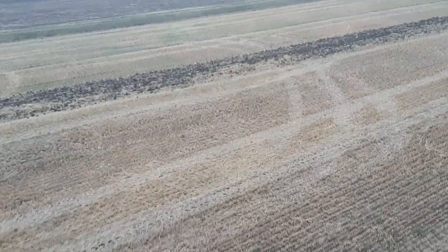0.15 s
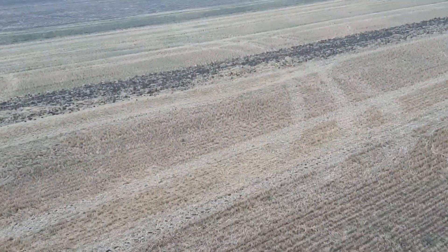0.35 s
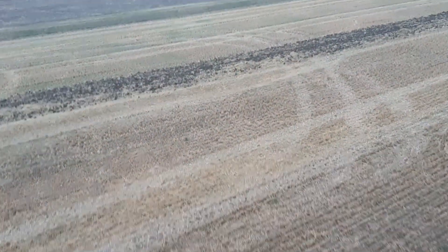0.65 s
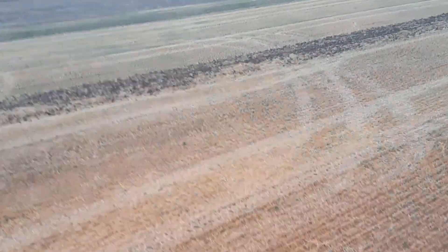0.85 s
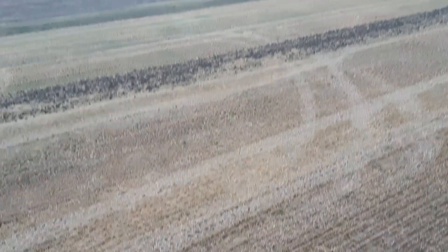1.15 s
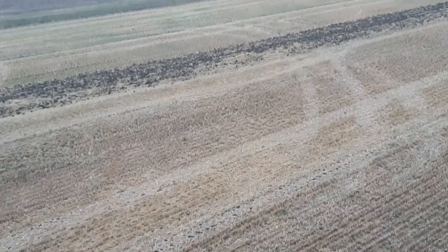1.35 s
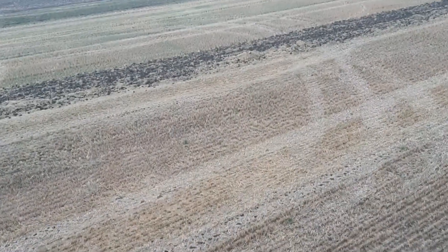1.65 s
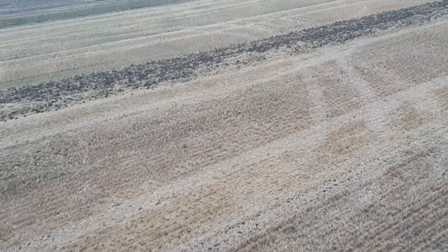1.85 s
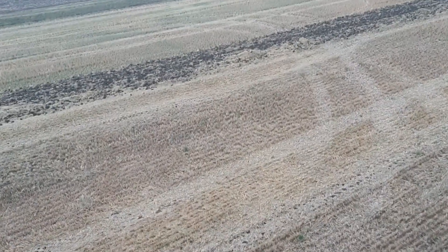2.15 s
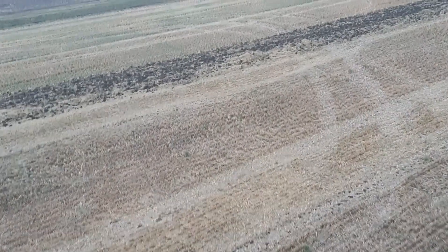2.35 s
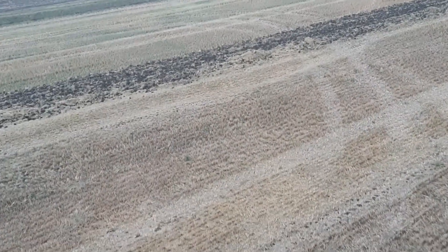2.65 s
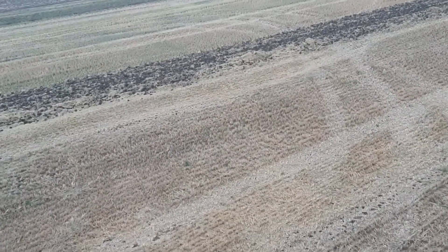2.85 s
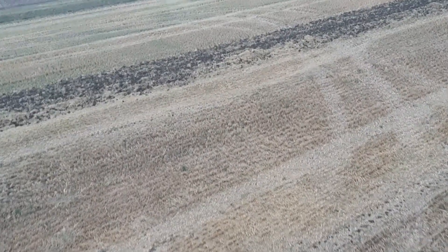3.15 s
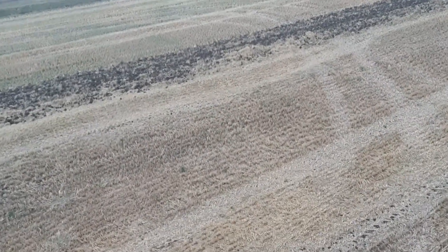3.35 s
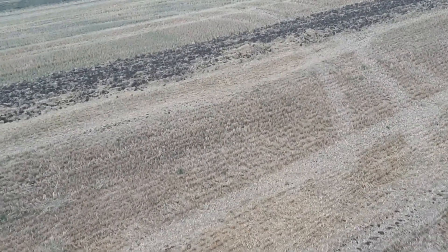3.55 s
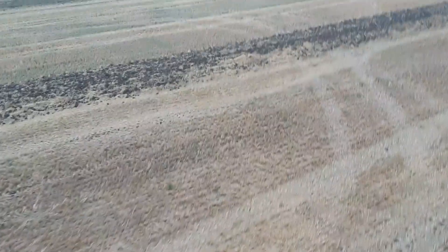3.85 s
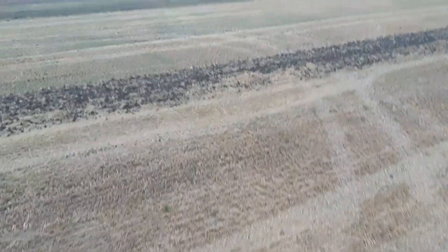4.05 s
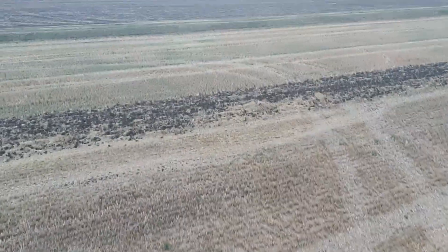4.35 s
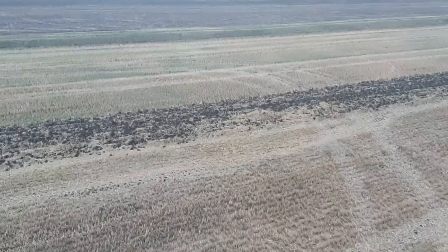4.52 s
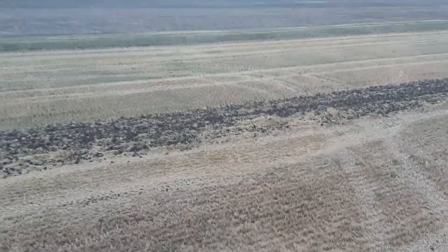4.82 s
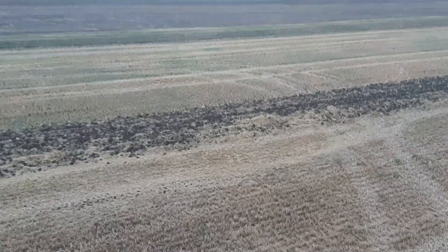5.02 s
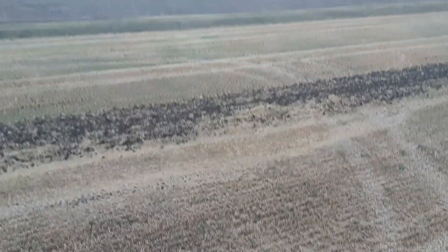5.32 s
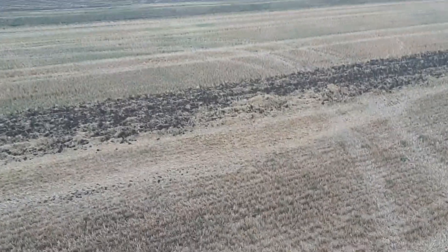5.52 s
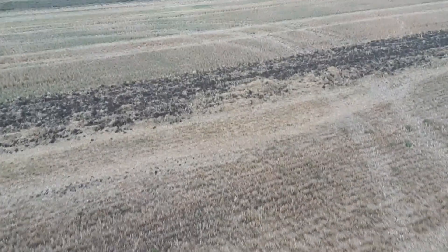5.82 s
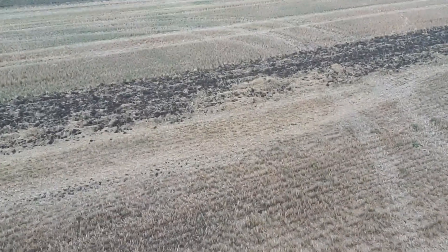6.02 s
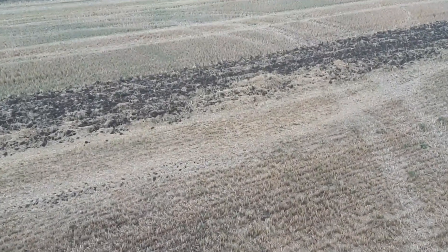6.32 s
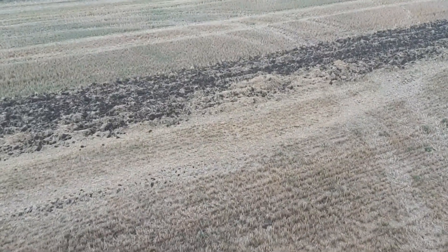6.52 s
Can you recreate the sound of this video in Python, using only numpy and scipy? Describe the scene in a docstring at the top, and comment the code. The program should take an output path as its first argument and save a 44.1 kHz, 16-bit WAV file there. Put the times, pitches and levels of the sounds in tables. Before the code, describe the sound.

Outdoors in a balloon basket, a propane pilot flame runs throughout: a low rumble of quick fluttering puffs with a thin, uneven, slightly resonant gas hiss. It starts a little subdued and rises slightly. At about 0.6 s the valve cracks open with a dull tick and a sharp jet hiss; almost at once the flame catches with a thump and becomes a loud, broad roar with bright hissing edges. At about 0.87 s it shuts, dropping steeply, leaving a faint leak that closes near 1.05 s with small metallic ticks until 1.2 s. The pilot is now ducked by the camera's gain, stays low about a second, then gradually recovers. A tick falls at 2.4 s, faint hollow knocks around 2.6-3.1 s, and faint ticks at 4.5 and 5.9 s. The pilot continues to the end, about 6.5 s. Stereo is close and dry, the right side shaded and duller.

```python
"""A pilot flame rumbles and hisses on a propane burner above a balloon basket. The blast valve opens
once for a third of a second: the jet hisses, the flame catches with a thump and roars. The valve lever
and hot metal tick; faint hollow knocks ring. Flames are shaped noise, ticks noise bursts, knocks sines.
A small camera listens through an open left and a shaded right port; its gain control starts ducked,
ducks again at the blast, holds, and recovers."""
import sys
import numpy as np
from scipy import signal
from scipy.fft import rfft, irfft
from scipy.io import wavfile
from scipy.ndimage import uniform_filter1d, minimum_filter1d

SR = 44100
rng = np.random.default_rng(int(sys.argv[2]) if len(sys.argv) > 2 else 0)


def generate_wav(sig):
    """Save sig (samples, or channels by samples) to the path in sys.argv[1] as 16-bit PCM at SR."""
    pcm = np.round(np.clip(np.atleast_2d(sig).T, -1, 1) * 32767).astype(np.int16)
    wavfile.write(sys.argv[1], SR, pcm)


N = 294588

# Phase by which the left port leads for pilot and ticks. Each row: frequency in Hz, phase in radians.
PILOT_LEAD = [(0, 0), (860, 0.0), (1120, 4.4), (2670, 5.8), (3530, 3.2), (3880, -1.4), (5940, -3.9),
              (6980, -6.4), (7580, -4.9), (11500, -17.1), (13700, -22.3), (16000, -42.2)]

# All levels in dB below stand ahead of the camera's gain control.
# Blast valve: cracks open, is fully open, the gas lights, shuts, seats fully (s)
CRACK_S, OPEN_S, LIGHT_S, SHUT_S, SEATED_S = .587, .626, .637, .872, 1.053


def blast():
    """The jet hisses first; the flame catches with a thump, roars, and both die away."""
    # Blast colour at the open port. Each row: frequency in Hz, relative level in dB per Hz.
    slope = [(28, -32.5), (45, -32), (70, -4.5), (150, 2), (260, -2), (330, -7), (600, -11.5), (1200, -15),
             (2300, -19), (3600, -17), (5500, -14.5), (8000, -24), (12500, -24), (15700, -19)]
    # Its resonances and echo notches. Each row: centre in Hz, width in Hz, height in dB.
    modes = [(900, 410, -6), (1185, 80, 6.5), (2820, 105, 13.5), (3740, 270, 6.5), (4020, 230, -7),
             (4980, 200, 6.5), (5770, 690, 7.5), (6300, 220, 3.5), (8970, 520, 10.5), (10000, 370, -3),
             (11070, 380, 9)]
    # Ripples at the shaded port for a blast. Each row: centre in Hz, width in Hz, height in dB.
    ripples = [(1079, 330, -9), (1740, 290, 4.5), (2570, 90.0, 2.5), (3440, 90.0, -5), (7230.0, 300.0, 3),
               (9920.0, 160.0, 6.5)]
    # Phase by which the left port leads. Each row: frequency in Hz, phase in radians.
    lead = [(350, 0), (800, .6), (1050, 0), (1400, -1.1), (1900, -1.2), (2500, .3), (3000, -.3),
            (3600, 1.7), (5770, 2.5), (6550, 7), (16000, 4.8)]

    def colour_db(hz):
        """Blast spectrum: broad slope plus resonances and notches."""
        return read(slope, hz) + bumps(modes, hz)

    roar, jet = at_ports(colour_db, ripples, lead, alike_power=0.84, patchy_db=2.0)
    treble_band = signal.butter(4, 7500, "high", fs=SR, output="sos")
    treble = signal.sosfiltfilt(treble_band, jet)
    t = np.arange(N) / SR
    jet_db, treble_db = jet_levels(t)
    jet = jet + (gain_of(treble_db) - 1) * treble  # slow gas hisses duller
    lumps = flicker(per_s=48)
    flame_sound = roar * roar_gain(t) * gain_of(0.77 * lumps)
    jet_sound = jet * gain_of(jet_db + 0.92 * lumps)
    return flame_sound + jet_sound


def jet_levels(t):
    """Level and treble lift of the gas jet in dB: swell, hold, fall, leak, drain."""
    full_db, rise_db_per_s, fall_db_per_s = -13, 447, 371  # swell up to OPEN_S, fall after SHUT_S
    crack_db_per_s = 1301  # how sharply the first gas bites at CRACK_S
    # gas leaks on until the valve seats, then the line drains
    shut_leak_db, seat_drop_db, drain_db_per_s = -38, -6, 68
    dip_db, dip_delay_s, dip_s = -8.5, 0.0091, .016  # the hiss dips briefly as the flame catches
    bright_above_db, dull_per_db = -26.5, 0.6  # below this jet level the treble falls faster
    flare_db, flare_s = 5.5, 0.049  # extra treble just after lighting

    seated = np.maximum(t - SEATED_S, 0)
    seating_db = seat_drop_db * np.minimum(seated / 0.013, 1)
    leak_db = np.where(t > SHUT_S, shut_leak_db + seating_db - drain_db_per_s * seated, -200)

    swell_db = -rise_db_per_s * np.maximum(OPEN_S - t, 0)
    fall_db = -fall_db_per_s * np.maximum(t - SHUT_S, 0)
    crack_db = -crack_db_per_s * np.maximum(CRACK_S - t, 0)
    level_db = np.maximum(full_db + swell_db + fall_db + crack_db, leak_db)

    lit = np.maximum(t - LIGHT_S, 0)
    dulling_db = dull_per_db * np.minimum(level_db - bright_above_db, 0)
    treble_db = dulling_db + flare_db * (lit > 0) * bell(lit, 0, flare_s)
    return level_db + dip_db * bell(t, LIGHT_S + dip_delay_s, dip_s), treble_db


def roar_gain(t):
    """The flame catches at once, thumps, sags a little, dies after the jet and lingers."""
    roar_db, catch_db_per_s, sag_db_per_s = -4, 3501.5, 9
    thump_db, thump_delay_s, thump_s = 0.5, 0.014, .013
    lag_s, fall_db_per_s = 0.023, 310  # the flame outlives the jet
    linger_db, linger_db_per_s = -33.5, 44.5  # last flames on the burner

    lit = np.maximum(t - LIGHT_S, 0)
    dying = np.maximum(t - SHUT_S - lag_s, 0)
    catch_db = -catch_db_per_s * np.clip(LIGHT_S - t, 0, .05)
    thump = thump_db * bell(lit, thump_delay_s, thump_s)
    flame_db = roar_db - sag_db_per_s * lit + thump - fall_db_per_s * dying
    last_flames = gain_of(linger_db - linger_db_per_s * dying)
    return gain_of(catch_db) * (gain_of(flame_db) + last_flames)


def pilot():
    """Small flame: a rumble of quick puffs and a gas hiss that flutters a little with it."""
    # Pilot colour at the open port. Each row: frequency in Hz, relative level in dB per Hz.
    slope = [(30, -50), (50, -47), (80, -11.5), (130, 1), (250, 2), (500, -2.5), (800, -13), (1500, -13.5),
             (4000, -18.5), (7500, -22), (8500, -37), (12500, -45.5), (15700, -36.5)]
    # Its resonances and echo notches. Each row: centre in Hz, width in Hz, height in dB.
    modes = [(896, 113, -14.5), (1092, 177, -12), (1213, 170, 5.5), (1707, 176, -16.5), (1962, 72, 7.5),
             (2156, 384, -10), (2776, 147, 10.5), (2998, 158, 12.5), (3465, 180.0, -5), (3766, 118, -10.5),
             (3995, 176, -11.5), (5235, 95, 11.5), (5840, 160, 5), (6085, 240, 11), (6620, 234, -15),
             (7300, 220, -14), (8120.0, 140.0, -5), (10700, 290.0, 2)]
    # Ripples at the shaded port for the pilot. Each row: centre in Hz, width in Hz, height in dB.
    ripples = [(963, 48, 2), (1130, 210, -12), (1555, 130, -15), (1722, 250, 13), (2304, 280, 7),
               (2960, 300, -9.5), (3340, 90.0, 3.5), (3876, 210, 11.5), (4240, 100.0, -8),
               (5300, 130.0, -6), (5470.0, 120.0, 6.5), (5860, 210.0, 9), (6100, 100.0, -20),
               (8170.0, 170.0, -1.5)]
    rumble_db, hiss_db = -39, -46.5  # middle levels, about which the flame flutters

    def colour_db(hz):
        """Pilot spectrum: broad slope plus resonances and notches."""
        return read(slope, hz) + bumps(modes, hz)

    rumble, hiss = at_ports(colour_db, ripples, PILOT_LEAD, alike_power=1.0, patchy_db=1.57)
    puffs, sway = flicker(per_s=143), flicker(per_s=24)
    rumble_sound = rumble * gain_of(rumble_db + 1.48 * puffs + 0.19 * sway)
    hiss_sound = hiss * gain_of(hiss_db + 0.74 * puffs + 0.069 * sway)
    return rumble_sound + hiss_sound


def ticks():
    """Each tick starts sharply and scatters off the frame as a short tail, dull or bright."""
    # Ticks of the valve lever and hot metal. Each row: start in seconds, starting level in dB before
    # the tilt, time to fall 60 dB in seconds, brightness tilt in dB per octave (flattening in the bass).
    tick_rows = [(.621, -24, .07, -6), (1.027, -41, .13, 3), (1.140, -54, .12, -2), (1.179, -50, .14, -1),
                 (2.373, -46, .17, 0), (2.838, -61, .1, 3), (4.478, -55, .28, -5), (5.886, -50, .16, -1)]
    # Tick colour before the tilt. Each row: frequency in Hz, relative level in dB per Hz.
    slope = [(500, -20), (1500, -9), (4000, -7), (6000, -1), (9000, -2), (12000, -6), (15000, 1)]

    def colour_db(hz):
        """Tick spectrum."""
        return read(slope, hz)

    _, ring = at_ports(colour_db, [(12000, 12000, -6)], PILOT_LEAD, alike_power=1.5, patchy_db=1.0)
    out, size = np.zeros((2, N)), 8192  # longest tail in samples
    t, hz = np.arange(size) / SR, np.fft.rfftfreq(size, 1 / SR)
    octaves = np.log2(hz / 8000 + .05)
    for start_s, db, t60, tilt_db in tick_rows:
        at = round(start_s * SR)
        spectrum = rfft(ring[:, at:at + size])
        tilted = irfft(spectrum * gain_of(tilt_db * octaves))
        out[:, at:at + size] += tilted * gain_of(db - 60 * t / t60)
    return out


def knocks():
    """Short hollow sine rings with soft edges, nearer the open port."""
    # Faint knocks. Each row: start in seconds, level in dB before the soft edge and the port
    # difference, pitch in Hz, time to fall 60 dB in seconds.
    knock_rows = [(2.575, -43, 1250, .12), (2.731, -43, 1180, .1), (2.836, -41, 1330, .12),
                  (2.84, -41, 1520, .1), (3.07, -45, 1300, .1)]
    t, out = np.arange(N) / SR, np.zeros(N)
    for start_s, db, hz, t60 in knock_rows:
        age = np.maximum(t - start_s, 0)
        soft_edge = 1 - np.exp(-age / 0.0018)
        out = out + gain_of(db - 60 * age / t60) * soft_edge * np.sin(2 * np.pi * hz * age)
    return out * gain_of([[1.5], [-6]])  # dB at the left and right port


def at_ports(colour_db, ripples, lead, alike_power, patchy_db):
    """Noise of a colour as both ports hear it, split in a low and a high part."""
    # The right port lies in the shade of the camera body.
    # Each row: frequency in Hz, level in dB against the left port, before the ripples.
    shade = [(200, 0.0), (400, 1.5), (800, -0.3), (2000, -4.5), (4000, -7.5), (4400, -19.5), (5000, -29),
             (6500, -7.5), (9000, -14.5), (13500, -4), (15700, -12.5)]
    # Likeness of the ports. Each row: frequency in Hz, likeness 0-1 before the echo dips and power.
    alike = [(200, 1), (350, 0.99), (600, 0.99), (900, 0.88), (2000, 0.92), (3000, 0.82), (4000, 1),
             (5000, .2), (6200, .7), (7800, 0.39), (8300, 0.14), (15000, .05)]
    echo_hz, echo_first_hz = 599, 1080  # likeness dips at the notches of a short echo

    frames, hz = N // 256 + 5, np.fft.rfftfreq(1024, 1 / SR)
    a, b, c, d, patches = rng.standard_normal((frames, 513, 5)).T
    left = a + 1j * b
    stranger = c + 1j * d  # what the right port hears on its own

    notches = np.cos(np.pi * (hz - echo_first_hz) / echo_hz) ** 8
    dips = 1 - 0.28 * (hz > .8 * echo_first_hz) * notches
    same = (np.clip(read(alike, hz) * dips, 0, 1) ** alike_power)[:, None]
    delayed = left * np.exp(-1j * read(lead, hz))[:, None]
    right = same * delayed + np.sqrt(1 - same ** 2) * stranger
    right = right * gain_of(read(shade, hz) + bumps(ripples, hz))[:, None]

    # slow patches of level; the treble wavers most
    patches = uniform_filter1d(patches, size=14, axis=0)
    patches = uniform_filter1d(patches, size=30, axis=1)
    drift = patchy_db * np.sqrt(hz / 6000)[:, None] * patches / patches.std()
    spectra = np.array([left, right]) * gain_of(colour_db(hz)[:, None] + drift)

    low = 1 / (1 + (hz / 900) ** 6)[:, None]  # share of power in the low part
    parts = []
    for share in (low, 1 - low):
        sound = signal.istft(spectra * np.sqrt(share), nperseg=1024, noverlap=768)[1]
        parts.append(evened(sound[:, :N]))
    return parts


def flicker(per_s):
    """Turbulence: noise smoothed to a given rate, rms 1."""
    size = round(SR / per_s)
    smoothed = uniform_filter1d(rng.standard_normal(N), size)
    return evened(uniform_filter1d(smoothed, size))


def gain_of(db):
    """Decibels to a factor."""
    return 10 ** (np.asarray(db) / 20)


def evened(x):
    """Scales so that the mean of the channels has rms 1."""
    return x / np.sqrt(np.mean(np.atleast_2d(x).mean(0) ** 2) + 1e-20)


def read(points, hz):
    """Straight lines on a log-frequency axis."""
    f, value = np.transpose(points)
    return np.interp(np.log(hz + 1), np.log(f + 1), value)


def bumps(modes, hz):
    """Bell-shaped peaks and notches in dB."""
    return sum(db / (1 + (2 * (hz - f) / width) ** 2) for f, width, db in modes)


def bell(t, s, width_s):
    """A smooth hump of height 1."""
    return np.exp(-((t - s) / width_s) ** 2)


def scene():
    """All sources at the two ports."""
    return pilot() + blast() + ticks() + knocks()


def record(dry):
    """Gain control: quick to duck, holds, recovers steadily; then soft ceiling, bass cut, band limit."""
    power = uniform_filter1d(dry.mean(0) ** 2, size=3000)
    power_db = 10 * np.log10(abs(power) + 1e-12)
    over_db = 0.26 * np.maximum(power_db + 30, 0)  # ducks 0.26 dB for each dB above -30

    # the deepest duck of the last hold time
    hold = round(.995 * SR)
    padded = np.r_[np.zeros(hold), -over_db]
    deepest = minimum_filter1d(padded, hold + 1 - hold % 2)
    held_db = -deepest[(hold + 1) // 2:][:N]

    fall = np.arange(N) * 13.3 / SR  # recovery in dB a second
    earlier_db = 6.0  # still ducked from the blast before
    duck_db = np.maximum(np.maximum.accumulate(held_db + fall), earlier_db) - fall
    ducked = dry / gain_of(uniform_filter1d(duck_db, size=100))

    limited = 1.5 * np.tanh(ducked / 1.5)
    no_bass = signal.sosfilt(signal.butter(3, 45, "high", fs=SR, output="sos"), limited)
    band_limit = signal.firwin(767, 15720, window=("kaiser", 9), fs=SR)  # upper edge in Hz
    return signal.oaconvolve(no_bass, band_limit[None], "same")


dry = scene()
out = record(dry)
generate_wav(out)
```